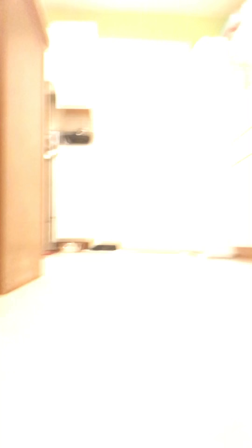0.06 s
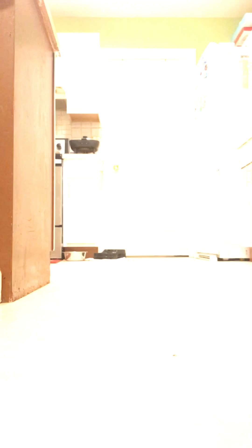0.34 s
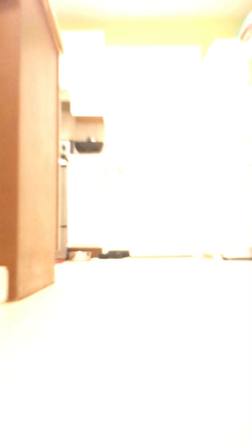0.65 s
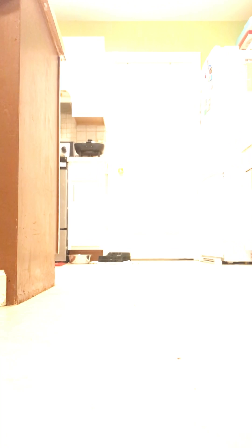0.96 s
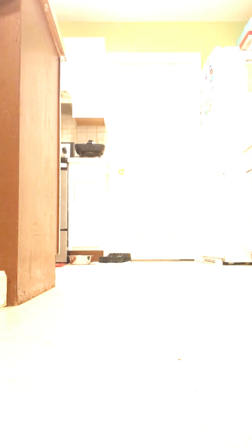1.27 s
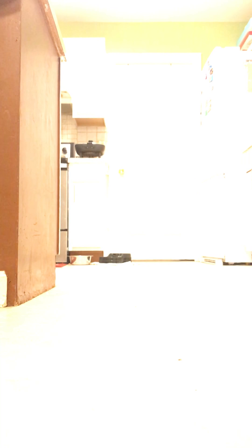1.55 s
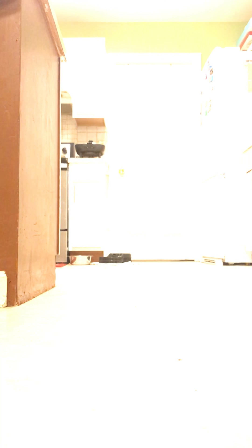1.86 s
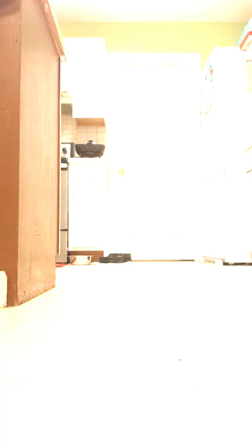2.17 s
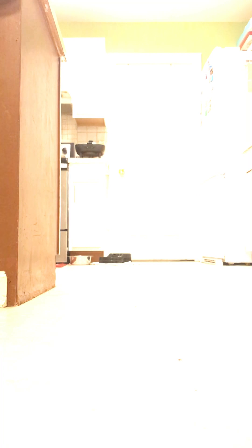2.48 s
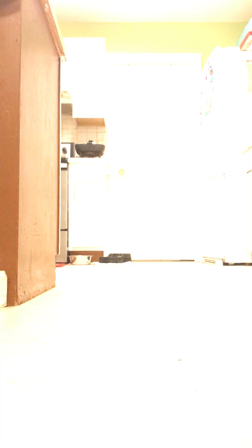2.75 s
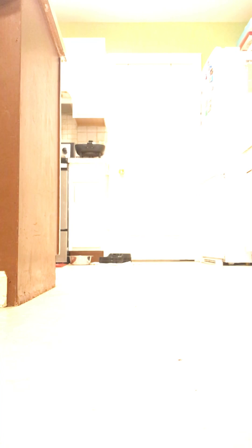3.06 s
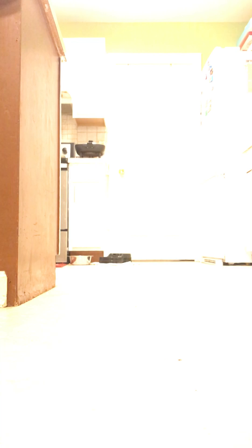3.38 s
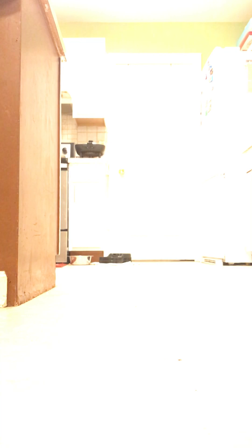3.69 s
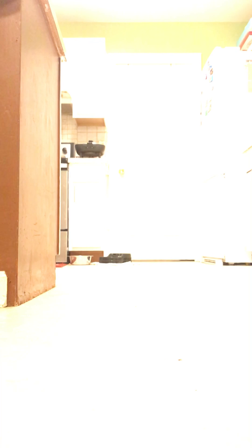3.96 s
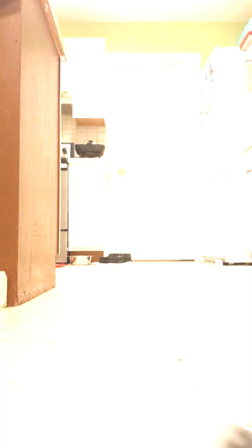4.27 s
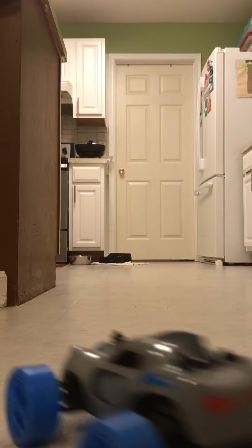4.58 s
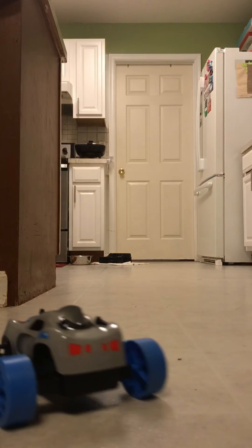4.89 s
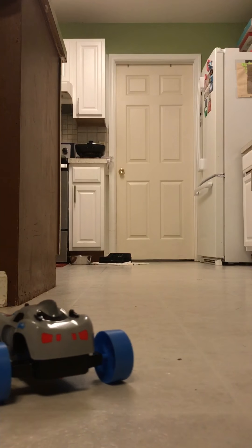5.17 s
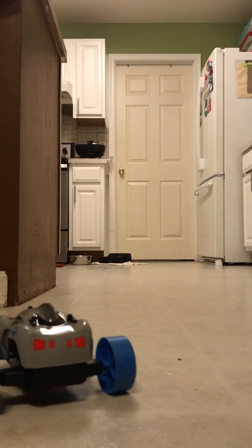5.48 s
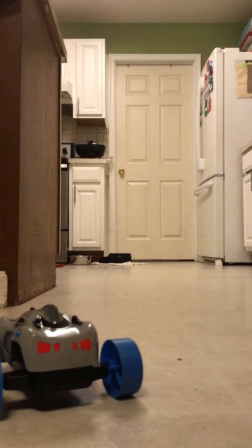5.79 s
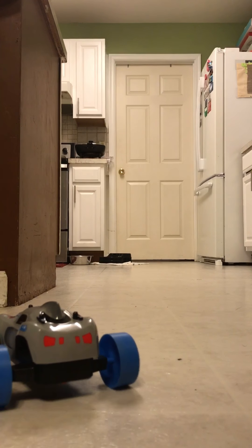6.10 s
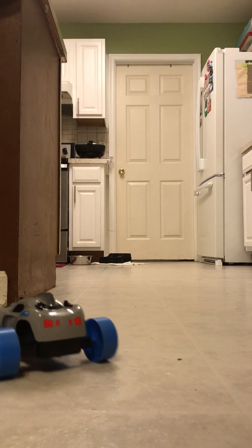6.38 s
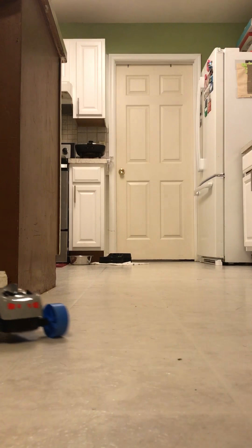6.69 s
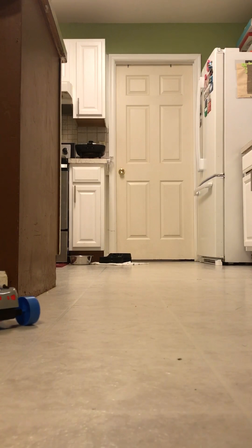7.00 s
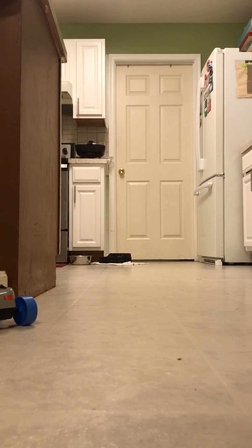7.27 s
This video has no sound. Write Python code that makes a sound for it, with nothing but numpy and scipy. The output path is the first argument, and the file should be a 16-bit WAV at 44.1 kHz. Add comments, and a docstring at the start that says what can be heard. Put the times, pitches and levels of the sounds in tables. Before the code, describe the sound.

After close handling thumps and scrapes, a small toy car drives in bursts, plastic gears whirring, steering clacking and rims drumming on tile.

```python
"""Toy car on kitchen tiles

A microphone at floor level is bumped and shuffled into place: its hollow case thumps, ticks, creaks
and slides over grit. A remote-control car clacks its steering and drives in spurts, loose plastic
gears whirring, bare rims drumming and scraping on the tiles. It races by, coasts, jerks forward,
creeps off and ends up straining against a cupboard, its gears throbbing and ratcheting."""
import sys
import numpy as np
from scipy import signal
from scipy.fft import rfft, irfft
from scipy.io import wavfile
from scipy.ndimage import uniform_filter1d, map_coordinates

SR = 44100
rng = np.random.default_rng(int(sys.argv[2]) if len(sys.argv) > 2 else 0)


def materialize(psi):
    """Save the field psi as 16-bit PCM at rate SR to the path in sys.argv[1].

    A 1-D psi becomes a single channel; in a 2-D psi each row is a channel.
    """
    bounded = np.clip(np.atleast_2d(psi).T, -1, 1)
    quanta = np.round(bounded * 32767).astype(np.int16)
    wavfile.write(sys.argv[1], SR, quanta)


N = 332514
TIME = np.arange(N) / SR
AGE = TIME[:SR // 8]   # time axis of one short hit

# Motor spurts (spin up, race by, jerk, faint roll, creep, strain): on/s, off/s, rise/s,
# run-down/(dB/s), gears/dB, shell/dB, scrape/dB, rim rumble/dB, floor boom/dB,
# first mesh f/Hz, settled mesh f/Hz, whine against rattle/dB, throb/dB
SPURTS = [ (3.786, 4.169, 0.036, 119, -31, -39, -43.5, -50, -56, 1448, 1326, -5.5, 2.5),
          (4.159, 4.481, 0.063, 32, -37.5, -39, -46.5, -38, -46.5, 1337, 1338, -32, 5),
          (5.235, 5.409, 0.056, 140, -32.5, -40, -46, -44.5, -59, 1411, 1484, -2, 3),
          (5.45, 5.726, 0.024, 5, -61.5, -60.5, -65, -67, -60, 1415, 1422, -18, 2.5),
          (5.986, 6.6, 0.06, 47, -43, -44.5, -54.5, -57, -63, 1049, 1110, -12, 2.5),
          (6.811, 7.54, 0.012, 52.5, -38, -46, -51, -52.5, -60.5, 1117, 1137, -3, 1.5), ]


def from_db(db):
    """Decibels to gain."""
    return 10 ** (np.asarray(db) / 20)


def rms_one(x):
    """Scale to rms 1."""
    return x / np.sqrt(np.mean(x ** 2) + 1e-20)


def evened(x, seconds):
    """Hold the running rms at 1."""
    return x / np.sqrt(np.maximum(uniform_filter1d(x ** 2, int(seconds * SR)), 1e-12))


def bell(t, half_length):
    """Bell-shaped envelope that peaks at t = 0."""
    return np.exp(-np.minimum((t / half_length) ** 2, 30))


def swells(rows):
    """Envelopes that rise to peaks and die away; one gain curve for each level column."""
    power = 0
    for s, rise_s, fall_s, *db in rows:
        distance = np.maximum((s - TIME) / rise_s, (TIME - s) / fall_s)
        power = power + np.outer(from_db(db) ** 2, np.exp(-2 * np.minimum(distance, 20)))
    return np.sqrt(power)


def drift(rate):
    """Random wander of rms 1 with a new value so many times a second."""
    return rms_one(map_coordinates(rng.standard_normal(N // 20), [TIME * rate], order=1))


def coloured(x, spectrum):
    """EQ through (f/Hz, level/dB) points, rolling off below the first."""
    hz, db = np.transpose(spectrum)
    bins = np.maximum(np.arange(N // 2 + 1) * SR / N, 1)
    curve = from_db(np.interp(np.log(bins), np.log(hz), db))
    return irfft(rfft(x) * curve * np.minimum(bins / hz[0], 1), N)


def band(x, low_hz, high_hz, order=2):
    """Causal band-pass."""
    sos = signal.butter(order, [low_hz, min(high_hz, .45 * SR)], "band", fs=SR, output="sos")
    return signal.sosfilt(sos, x + 1e-18)


def resonate(x, hz, width_hz):
    """One resonance with gain 1 at its peak."""
    r, w = np.exp(-np.pi * width_hz / SR), 2 * np.pi * hz / SR
    return signal.lfilter(np.array([1, 0, -1]) * (1 - r * r) / 2, [1, -2 * r * np.cos(w), r * r], x)


def ring(clicks, hz, t60):
    """A unit click sets a sine of height 1 ringing."""
    r, w = from_db(-60 / (t60 * SR)), 2 * np.pi * hz / SR
    return signal.lfilter([0, np.sin(w)], [1, -2 * r * np.cos(w), r * r], clicks + 1e-18)


def clicks_at(seconds, gains):
    """Single-sample impulses."""
    out = np.zeros(N)
    out[np.round(np.asarray(seconds) * SR).astype(int)] = gains
    return out


def bursts(seconds, db, t60):
    """Noise that starts at each moment and dies away."""
    decay = from_db(-60 / (t60 * SR))
    envelope = signal.lfilter([1], [1, -decay], clicks_at(seconds, from_db(db)) + 1e-18)
    return envelope * rng.standard_normal(N)


def puff(db, t60):
    """One short noise that dies away."""
    return from_db(db - 60 * AGE / t60) * rng.standard_normal(len(AGE))


def grains(per_s, spread_db):
    """Tiny contacts at random moments, a few much larger than the rest."""
    sizes = from_db(spread_db * np.minimum(rng.exponential(1, N), 4)) * rng.choice([-1, 1], N)
    return rms_one(sizes * (rng.random(N) < per_s / SR))


def add(out, s, x):
    """Mix a short sound in at a moment."""
    start = int(round(s * SR))
    out[start:start + len(x)] += x[:N - start]


def kitchen(x, t60, treble_t60, wet_db):
    """Add the room's diffuse tail; lows and treble each have their own decay."""
    age = TIME[:SR // 2]
    low, high = rng.standard_normal((2, len(age)))
    tail = band(low, 100, 2670) * from_db(-60 * age / t60)
    tail += band(high, 5200, 21000) * from_db(-60 * age / treble_t60 - 5)
    tail *= np.clip(age / 0.0057 - 1, 0, 1)   # pre-delay, then fade in
    return x + from_db(wet_db) * signal.fftconvolve(x, tail / np.sqrt(np.sum(tail ** 2)))[:N]


def floor_boom():
    """The low rumble of the floor, rms 1."""
    # Boom spectrum: f/Hz, level/dB
    spectrum = [(25, -47), (42, 5), (60, 18.5), (85, 5), (130, -0.5), (250, -45)]
    return rms_one(coloured(rng.standard_normal(N), spectrum))


def room_tone():
    """The quiet kitchen: steady air over a low rumble."""
    # Air spectrum: f/Hz, level/dB
    spectrum = [(15, -54), (25, -71), (53, -36), (59, -24), (84, -2.5), (99, -4), (344, -9.5),
                (1440, -24.5), (1890, -21), (2910, -25.5), (4370, -28.5), (7000, -29.5), (10000, -35.5),
                (16000, -37)]
    air = rms_one(coloured(rng.standard_normal(N), spectrum))
    return from_db(-62) * air + from_db(-70) * floor_boom()


def through_case(x):
    """The hollow colour of the microphone's case."""
    # Case resonances: f/Hz, width/Hz, level/dB
    case_modes = [(616, 64, 4.5), (1320, 400, 4.5), (1850, 370, 2.5), (2660, 290, -35), (4260, 470, 7),
                  (5830, 350, -2.5)]
    return sum(from_db(db) * resonate(x, hz, width_hz) for hz, width_hz, db in case_modes)


def case_thumps():
    """Each bump on the case rings one low, damped tone."""
    # Bumps: t/s, level/dB, f/Hz, t60/s
    bumps = [(0.049, -16.5, 116, 0.025), (0.048, -51, 234, 0.03), (0.071, -34.5, 69.5, 0.26),
             (0.149, -33.5, 50.7, 0.37), (0.379, -41.5, 85, 0.06), (0.702, -22, 86, 0.043),
             (0.699, -27, 521, 0.01), (1.418, -40, 228, 0.063), (1.447, -43, 89, .08),
             (1.903, -38, 266, 0.063), (1.931, -43.5, 261, 0.04), (2.213, -35, 268, 0.03),
             (2.685, -30.5, 310, 0.029), (2.744, -30, 298, 0.021), (2.839, -26.5, 317, 0.034)]
    return sum(ring(clicks_at([s], from_db(db)), hz, t60) for s, db, hz, t60 in bumps)


def case_creak():
    """Each slip of the gripped case rings one hollow resonance, with a little snap on top."""
    # Uneven slips: t/s, level/dB
    creaks = [(0.072, -39), (0.11, -34.5), (0.13, -42), (0.1493, -32.5), (.169, -34), (0.1888, -39),
              (0.2095, -30.5)]
    s, db = np.transpose(creaks)
    slips = bursts(s, db, t60=0.018)
    return 3.4 * resonate(slips, 1620, 370) + 0.55 * band(slips, 3760, 4300, order=1)


def finger_ticks():
    """A finger on the case gives a dull knock, a bright tick and a crisp top."""
    # Touches: t/s, knock/dB, knock f/Hz, tick/dB, top/dB
    touches = [(0.0499, -42, 580, -33, -22.5), (0.0775, -58, 597, -31, -26), (0.352, -54, 1200, -35.5, -57),
               (0.374, -41.5, 915, -58, -62), (0.701, -41.5, 600, -24, -27.5), (1.089, -57, 583, -74, -70),
               (1.293, -56, 950, -54, -74.5), (1.413, -44, 650, -40, -50), (1.427, -45, 597, -14, -33),
               (1.4316, -41, 940, -25, -34), (1.489, -48, 1300, -26, -45), (1.504, -44, 1190, -29, -38),
               (1.511, -41, 1210, -37, -44), (1.623, -38.5, 850, -35, -44), (1.633, -43, 990, -42, -43),
               (1.67, -44.5, 1180, -41, -50), (1.903, -49.5, 650, -45, -45), (2.077, -42, 1340, -28.5, -48),
               (2.449, -50, 1210, -32.5, -42), (2.486, -53, 950, -27.5, -40), (2.528, -34, 950, -30, -48),
               (2.5853, -50, 590, -28, -44), (2.684, -44, 600, -52, -60), (2.744, -49, 600, -54, -60),
               (2.84, -43, 620, -48, -43), (3.1505, -40, 1190, -23, -34), (3.168, -34.5, 1190, -34, -29),
               (3.193, -43, 1190, -24, -39), (3.215, -43, 1200, -23, -40), (3.238, -52, 1200, -24, -39),
               (3.2431, -46, 1200, -27, -39), (3.249, -43, 1180, -34, -39), (3.405, -49, 1280, -26.5, -45),
               (3.437, -55, 1300, -31, -42), (3.448, -53, 594, -29, -42)]
    out = np.zeros(N)
    for s, knock_db, knock_hz, tick_db, top_db in touches:
        push, snap = puff(knock_db + 10, t60=0.033), puff(tick_db - 10.5, t60=0.018)
        knock = 0.63 * band(push, 180, 1340) + 4.65 * resonate(push, knock_hz, 134)
        tick = 2.8 * band(snap, 2760, 4270, order=1) + 0.79 * through_case(snap)
        top = band(puff(top_db, t60=0.0012), 4300, 12000)
        add(out, s, knock + tick + top)
    return out


def grit_crunch():
    """Coarse grains snap one by one and ring the hollow case, each with a colour of its own."""
    # Hollow rings under the grit: f/Hz, width/Hz, level/dB
    crunch_modes = [(324, 64, 7.5), (623, 125, 1), (820, 51, 8), (1147, 72, 1.5), (1530, 77, 4),
                    (3020, 220, -7.5), (3850, 560, -12.5)]
    snaps = grains(per_s=210, spread_db=2.2)
    rings = sum(from_db(db) * resonate(snaps * rng.standard_normal(N), hz, width_hz)
                for hz, width_hz, db in crunch_modes)
    return evened(rings, .04)


def case_slide():
    """The case slides over gritty tile: fine friction, crunch, boom and a crackle as its edge catches."""
    # Pushes: peak t/s, rise/s, fall/s, body/dB, grit/dB
    pushes = [(0.17, 0.1, 0.098, -56.5, -60.5), (0.37, 0.043, 0.063, -61.5, -63),
              (1.175, 0.014, 0.012, -57.5, -57), (1.43, 0.0015, 0.013, -32.5, -31.5),
              (1.506, 0.029, 0.019, -40, -42.5), (1.626, 0.038, 0.049, -41, -53),
              (1.70, 0.18, 0.054, -51.5, -48), (1.85, 0.022, 0.057, -62.5, -61),
              (2.075, 0.041, 0.033, -48.5, -53), (2.45, 0.063, 0.0041, -51, -50.5),
              (2.49, 0.017, 0.014, -46, -45.5), (2.533, 0.0069, 0.024, -32, -38),
              (2.588, 0.013, 0.016, -42.5, -44), (2.69, 0.08, 0.067, -49, -52),
              (2.85, 0.076, 0.099, -48.5, -49.5), (3.153, 0.0037, 0.076, -43, -39.5),
              (3.172, .01, .015, -50, -41), (3.22, 0.043, 0.026, -43.5, -41),
              (3.245, 0.014, 0.0065, -54, -38), (3.385, .015, .02, -55, -58),
              (3.406, 0.021, 0.009, -47.5, -47.5), (3.437, 0.013, 0.054, -50.5, -57)]
    # Friction spectrum of case on tile: f/Hz, level/dB
    spectrum = [(50, -16), (200, 3.5), (400, -1.5), (520, -7.5), (850, -2.5), (1250, -6), (2200, -8),
                (3200, -3.5), (4400, -9), (5300, -7.5), (7500, -11), (10300, -15), (13000, -5), (16000, 3)]
    body_gain, grit_gain = swells(pushes)
    friction = coloured(grains(per_s=6000, spread_db=2.85), spectrum) * from_db(2.06 * drift(90))
    friction = friction + through_case(friction)
    rub = rms_one(band(friction, 56, 3430, order=3))
    body = 0.97 * rub + from_db(-3.5) * grit_crunch() + from_db(-8.5) * floor_boom()
    catches = grains(per_s=170, spread_db=2.9)
    crackle = evened(through_case(catches) + 0.2 * band(catches, 2500, 12000), .06)
    grit = 0.81 * rms_one(band(friction, 3460, 11800, order=3)) + from_db(-7.5) * crackle
    return body * body_gain + grit * grit_gain


def steering_clacks():
    """A plastic lever hits its stop, or the drive train snaps taut, and rebounds at once; where it lands
    decides which modes ring."""
    # Clacks of steering and controls, plus the knocks at 3.8 s and 6.013 s as the drive train takes up its
    # slack when a spurt starts: t/s, body/dB, centre f/Hz, crack/dB, low cut/Hz, # accented ring f/Hz,
    # accent/dB
    clacks = [(3.095, -19.5, 1430, -13, 600, 2784, 4), (3.105, -23.5, 2550, -21, 850, 2433, 6),
              (3.5432, -13, 1630, -12, 1330, 2410, 7), (3.668, -34, 1390, -23.5, 400, 884, 0),
              (3.757, -22.5, 1380, -13.5, 766, 2390, 15), (3.8, -18.5, 1090, -34, 800, 1160, 10),
              (4.574, -16, 1610, -10, 1050, 1456, 2), (4.925, -27.5, 1203, -31, 830, 1170, -3),
              (4.938, -27, 1620, -36, 843, 1436, 0), (5.108, -23.5, 1322, -23, 870.6, 2360, 17),
              (5.4519, -15, 1720, -10, 1070, 1990, -3), (5.731, -26.5, 3430, -21, 1000, 3680, 4),
              (5.7641, -31.5, 2700, -31, 850, 2794, -12), (5.8741, -15.5, 2780, -9.5, 1490, 1990, 6.5),
              (5.9136, -23, 1864, -20, 1192, 1508, 2), (6.013, -29.5, 842, -40, 698.7, 878.5, -6.5),
              (6.561, -25, 1511, -36, 850.6, 1430, 0), (6.6128, -16.5, 1720, -17.5, 1100, 2784, 10),
              (6.674, -21, 2577, -21, 802, 2798, -2), (6.703, -17, 2230, -13, 1090, 1970, -3),
              (6.768, -21.5, 2490, -18, 1090, 2600, 8)]
    # Rings of the plastic: f/Hz, level/dB, t60/s
    clack_modes = [(854, 14, 0.015), (1255, 0, 0.037), (1470, 7, 0.025), (1780, 4, 0.018),
                   (1984, 2.5, 0.028), (2380, 2, 0.022), (2710, 3, 0.021), (3130, 7, 0.011),
                   (3870, 8.5, 0.017), (4400, 1, 0.045)]
    out = np.zeros(N)
    hz, mode_db, t60 = np.transpose(clack_modes)
    decays = from_db(-60 * np.outer(1 / t60, AGE))
    polarity = (-1) ** np.arange(len(hz))
    for s, body_db, centre_hz, crack_db, low_hz, accent_hz, accent_db in clacks:
        shift = accent_hz / hz[np.argmin(np.abs(hz - accent_hz))]   # all rings retune with the accent
        rings = np.sin(2 * np.pi * np.outer(shift * hz, AGE)) * decays
        colour_db = -11 * np.abs(np.log2(hz / centre_hz))
        colour_db += accent_db * bell(np.log2(hz / accent_hz), .12)
        blow = polarity * from_db(body_db + mode_db - 13.5 + colour_db + rng.standard_normal(len(hz)))
        rebound = 0.65 * blow * rng.standard_normal(len(hz))
        top_hz = max(2.63 * centre_hz, 2 * low_hz)   # a softer contact is duller
        crack = band(puff(crack_db - 12.5, t60=0.029), 4400, 6670, order=1)
        add(out, s, band(blow @ rings, low_hz, top_hz, order=3) + crack)
        add(out, s + rng.uniform(0.00085, 0.00144), band(rebound @ rings, low_hz, top_hz, order=3))
    return out


def throttle():
    """Each spurt rises, sags and runs down: five layer gains, then mesh Hz, whine dB and throb dB."""
    power, tone = np.full((5, N), 1e-14), np.zeros((3, N))
    for on, off, rise_s, run_down, *layer_db, first_hz, settled_hz, whine_db, throb_db in SPURTS:
        gear_db, shell_db, scrape_db, rim_db, floor_db = layer_db
        now = TIME >= on
        age, coasting = TIME[now] - on, np.maximum(TIME[now] - off, 0)
        effort = 1 - np.exp(-age / rise_s)
        sag_db = 2 * np.minimum(age, off - on)   # the motor tires under power
        fade_db = run_down * coasting + 8.5 * coasting ** 2   # friction fades a coasting car ever faster
        cut_db = 156 * coasting   # scrape and throb die once the motor is cut
        levels = [gear_db - sag_db - fade_db,
                  shell_db - sag_db - fade_db,
                  scrape_db - sag_db - cut_db,
                  rim_db - fade_db - 9 * coasting,   # the rumble dies sooner than the whir
                  floor_db - fade_db]
        power[:, now] += (effort * from_db(levels)) ** 2
        mesh_hz = settled_hz + (first_hz - settled_hz) * np.exp(-age / .12)
        tone[:, now] = np.broadcast_arrays(mesh_hz, whine_db, throb_db * from_db(-cut_db))
    return (*np.sqrt(power), *tone)


def shaft_turns():
    """Turns of the gear shaft, counted from the first throb against the cupboard."""
    # Shaft speed: t/s, speed/(turns/s)
    shaft = [(3.8, 30), (3.9, 41), (4.2, 50), (4.5, 49), (5.9, 20), (6.2, 39), (6.84, 39.6), (7.2, 37.5),
             (7.54, 37.4)]
    stall_s = 6.836
    turns = np.cumsum(np.interp(TIME, *np.transpose(shaft))) / SR
    return turns - np.interp(stall_s, TIME, turns)


def gear_load(turns, throb_db):
    """Tooth pressure peaks once a shaft turn and wherever the gears bind."""
    # Binds: t/s, boost/dB, half length/s
    binds = [(3.858, 6, .003), (4.642, 12, .014), (4.706, 14.5, .012), (4.765, 14, .013),
             (4.838, 10.5, .013), (4.912, 7, .018), (5.012, 11, .018), (5.264, 7, .005), (5.295, 8, .006),
             (5.327, 6, .005), (5.346, 7, .0035), (5.369, 11, .007), (5.391, 10, .006), (5.412, 6, .008),
             (5.444, 2, .003), (5.494, 5, .005)]
    throb = np.cos(2 * np.pi * turns) + 0.21 * np.cos(4 * np.pi * turns)
    unevenness = 1 + .13 * drift(35)
    db = throb_db * throb * unevenness + drift(200)
    for s, boost_db, half_length in binds:
        db += boost_db * bell(TIME - s, half_length)
    return evened(from_db(db), .085)


def rim_rumble(gain):
    """Uneven hollow rims drum on the tiles, wobbling from mode to mode, brighter when driven harder."""
    # Modes of rims and chassis: f/Hz, width/Hz, level/dB
    rim_modes = [(174, 13, -1), (206.4, 15.5, -3.5), (244.3, 15, 4.5), (286, 22.5, -1.5), (336, 16.3, -1.5),
                 (392.4, 20, -10.5), (600, 160, -15.5)]
    tilt_db_per_octave, pivot_hz = 9 * (gain / gain.max() - .5), rim_modes[2][0]
    rumble = np.zeros(N)
    for hz, width_hz, db in rim_modes:
        wobble_db = 3 * drift(14)
        drumming = resonate(grains(per_s=900, spread_db=2.9), hz, width_hz)
        rumble += from_db(db + tilt_db_per_octave * np.log2(hz / pivot_hz) + wobble_db) * drumming
    return evened(band(rumble, 148, 490), 0.13) * gain * from_db(-2)


def rim_scrape(load):
    """Bare plastic hisses over the grain of the tiles, pulsing with the gear load."""
    # Scrape spectrum: f/Hz, level/dB
    spectrum = [(3000, -28), (6500, 9), (8500, 2), (10300, -4), (11500, 2), (13500, 1.5), (16000, -6)]
    return rms_one(coloured(grains(per_s=7000, spread_db=4.3), spectrum)) * load ** 0.51


def tooth_chirp(half_length, hz, db, upper_db):
    """A slipping tooth sings two wavering tones, about a major third apart."""
    waver = uniform_filter1d(rng.standard_normal((2, len(AGE))), 64, axis=1)
    phases = 2 * np.pi * np.cumsum(hz * (1 + .16 * waver), axis=1) / SR
    tones = from_db(db) * np.sin(phases[0]) + from_db(upper_db) * np.sin(1.26 * phases[1])
    return tones * bell(AGE - AGE.mean(), half_length)


def slipping_teeth(turns):
    """Single hard slips, then a ratchet: against the cupboard one tooth jumps on every shaft turn."""
    # Hard slips: t/s, half length/s, f/Hz, level/dB, upper tone/dB
    slips = [(3.801, 0.004, 4160, -30, -58), (3.827, 0.0068, 4250, -33, -59),
             (3.8585, 0.0026, 4160, -22, -48), (3.897, 0.017, 4280, -28.5, -46),
             (3.931, 0.0037, 4200, -27, -39), (5.232, 0.003, 4750, -47.5, -71),
             (5.328, .005, 4450, -29, -34), (5.345, 0.003, 4570, -24.5, -35),
             (5.369, 0.0059, 4344, -21.5, -23.5), (5.392, 0.003, 4570, -21.5, -33),
             (5.399, 0.0013, 4570, -31, -38), (5.411, .006, 4480, -28, -44),
             (7.17, 0.0026, 4610, -26.5, -42), (7.223, .003, 4560, -24, -47),
             (7.489, 0.0025, 4485, -27, -42)]
    out = np.zeros(N)
    for s, *slip in slips:
        add(out, s - AGE.mean(), tooth_chirp(*slip))
    for s in np.interp(np.arange(turns[-1]), turns, TIME):
        jump = tooth_chirp(half_length=.005, hz=4570, db=-31, upper_db=-35.5)
        add(out, s - AGE.mean(), jump * from_db(rng.standard_normal()))
    return out


def off_cupboard(x):
    """A near reflection combs the sound; its notches glide as the car moves."""
    # Echo off the cupboard's side: t/s, delay/s
    echo_path = [(3.8, 0.0099), (4.3, 0.0044), (4.7, 0.0031), (5.2, 0.0017), (6.0, 0.00256), (6.8, .0016),
                 (7.54, .0016)]
    delay = np.interp(TIME, *np.transpose(echo_path))
    return x + .45 * map_coordinates(x, [(TIME - delay) * SR], order=1)


def gearbox(turns, load, mesh_hz, whine_db, gear_gain, shell_gain):
    """Loose plastic teeth whine and rattle; gears and shell ring in a balance set by how the car runs."""
    # Modes of shell and gearbox: f/Hz, width/Hz, racing/dB, coasting/dB, creeping/dB, straining/dB
    car_modes = [(832, 140, -4.5, -8, 3, -9), (1150, 124, -7.5, -9, 0, -12), (1427, 162, -3, -6.5, 4, -4),
                 (1786, 220, -11, -9, -6, -42), (2177.4, 76, -33, -34, 3, -8.5),
                 (2550, 130, -34, -49, -7, -43.5), (2860, 240, 1, -9, -1, -15.5),
                 (3080, 77, -3, -3, 6, -37), (3412, 52, -1.5, -4, 9, -4.5), (3913, 300, 5, 0.5, 6, -17),
                 (4100, 52, -17, -2, -19, 5), (4240, 110, 0, -4, -16, -23), (4545, 120, 2.5, -0.5, 6.5, -5),
                 (5310, 105, -11, -11, 0.5, -7.5), (5750, 630, -8, -10.5, -4.5, -14.5),
                 (6230, 460, -4, -9.5, -7, -27), (6350, 330, -11, -26, -23, -39),
                 (7250, 180, -38, -30, -1.5, -50), (9000, 1200, -9.5, -54, -7, -23)]
    # Midpoints of the crossfades between those four states: t/s
    state_changes = [4.58, 5.95, 6.8]
    state = sum(np.clip((TIME - s) / 0.27 + .5, 0, 1) for s in state_changes)
    # the motor wavers, and sags a little under each throb
    waver = 1 + .021 * drift(260) + .011 * drift(30) - .012 * np.cos(2 * np.pi * turns)
    teeth = np.cumsum(mesh_hz * waver) / SR
    harmonics = sum(np.cos(2 * np.pi * k * teeth + k * k) for k in range(1, 8)) / 3
    whine = from_db(whine_db) * load * harmonics   # outgrows the rattle as the teeth press harder
    strikes = (np.diff(np.floor(teeth), prepend=0) > 0) * from_db(1.3 * rng.standard_normal(N))
    gears, shell = np.zeros(N), np.zeros(N)
    for k, (hz, width_hz, *state_db) in enumerate(car_modes):
        # every tooth hits each mode with a new strength, over a bed of noise
        rattle = rms_one(rms_one(strikes * rng.standard_normal(N)) + 1.85 * rng.standard_normal(N))
        shifting_db = 2 * drift(45)   # loose gears shift on their axles
        mode_gain = from_db(np.interp(state, np.arange(4), state_db) + shifting_db)
        mode = resonate(rattle + (-1) ** k * whine, hz, width_hz) * mode_gain
        if hz < 2600:
            shell += mode
        else:
            gears += mode
    # above a threshold, hard-pressed teeth squeak
    pressure = np.clip(load * gear_gain / from_db(-30) - 1, 0, 2)
    squeak = from_db(4) * pressure * resonate(gears, hz=5130, width_hz=950)
    gears = evened(off_cupboard(band(gears, 1560, 6800) + squeak), .009)
    shell = evened(off_cupboard(band(shell, 300, 3900)), 0.025)
    return gears * load * gear_gain + shell * load ** 0.47 * shell_gain


def toy_car():
    """The throttle drives gears, rims and floor together; the rolling swells where the rims bite."""
    # The rims bite into the tiles: peak t/s, rise/s, fall/s, rumble/dB, scrape/dB, floor boom/dB
    bites = [(3.82, 0.014, 0.088, -48, -60, -43), (4.22, 0.049, 0.13, -36.5, -40.5, -58),
             (4.34, 0.05, 0.082, -37, -46, -60), (4.6, 0.032, 0.041, -36.5, -76, -54),
             (5.3, 0.022, 0.069, -42.5, -64, -52), (5.45, 0.048, 0.081, -49, -59, -47),
             (6.04, 0.05, 0.023, -47, -62, -45), (6.18, 0.021, 0.026, -44, -46.5, -67),
             (6.65, 0.29, 0.13, -42, -69, -47)]
    gear_gain, shell_gain, scrape_gain, rim_gain, floor_gain, mesh_hz, whine_db, throb_db = throttle()
    rim_gain, scrape_gain, floor_gain = np.hypot([rim_gain, scrape_gain, floor_gain], swells(bites))
    turns = shaft_turns()
    load = gear_load(turns, throb_db)
    rolling = rim_rumble(rim_gain) + rim_scrape(load) * scrape_gain + floor_boom() * floor_gain
    whir = gearbox(turns, load, mesh_hz, whine_db, gear_gain, shell_gain)
    started = np.clip((TIME - SPURTS[0][0]) / 0.002 + 1, 0, 1)   # silent until the first spurt
    return (rolling + whir + slipping_teeth(turns)) * started


def scene():
    """Car, clacks and handling all happen close to the microphone, so the room stays faint."""
    driving = kitchen(toy_car(), t60=0.14, treble_t60=0.2, wet_db=-8)
    contacts = steering_clacks() + case_thumps() + case_slide() + finger_ticks() + case_creak()
    contacts = kitchen(contacts, t60=0.24, treble_t60=0.28, wet_db=-17)
    return (room_tone() + contacts + driving)[None]


def record(dry):
    """The microphone drops the deepest bass; the top is cut steeply."""
    thinned = signal.sosfilt(signal.butter(3, 36, "high", fs=SR, output="sos"), dry)
    return signal.sosfilt(signal.ellip(10, .2, 80, 16000, fs=SR, output="sos"), thinned)


dry = scene()
out = record(dry)
materialize(out)
```